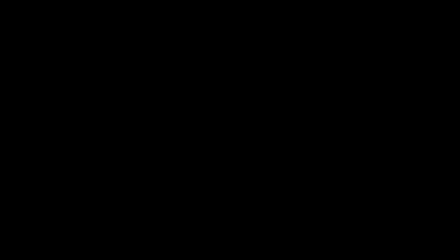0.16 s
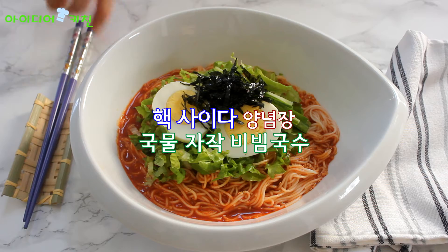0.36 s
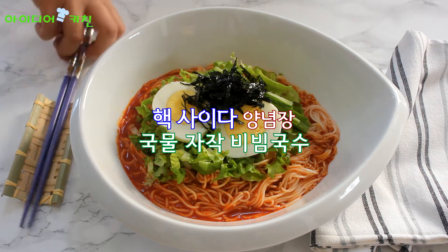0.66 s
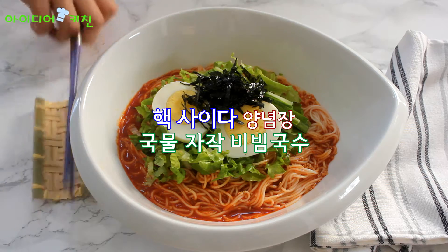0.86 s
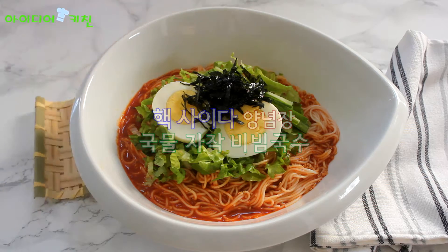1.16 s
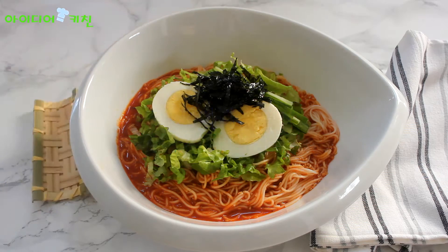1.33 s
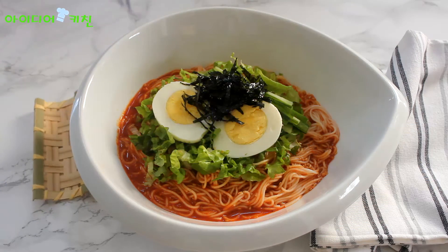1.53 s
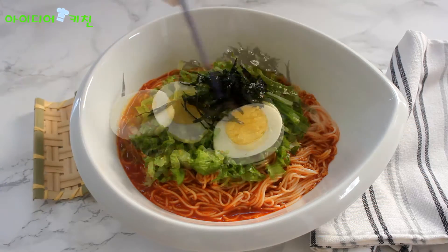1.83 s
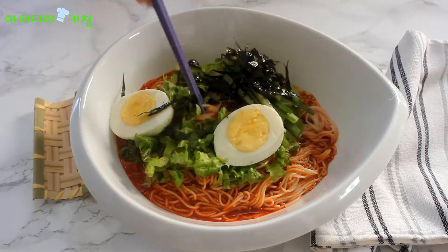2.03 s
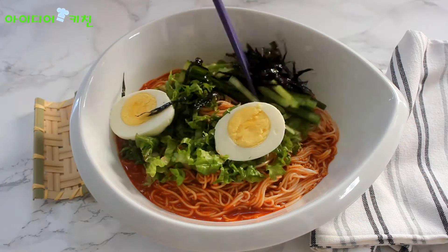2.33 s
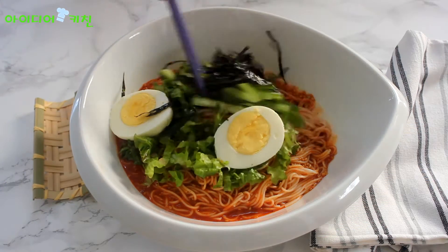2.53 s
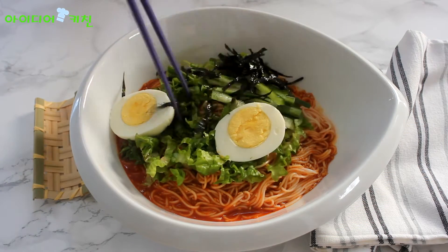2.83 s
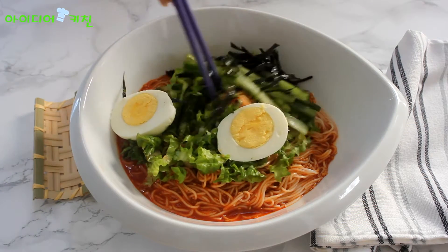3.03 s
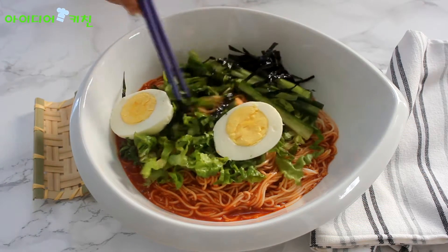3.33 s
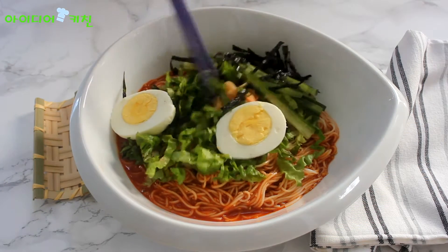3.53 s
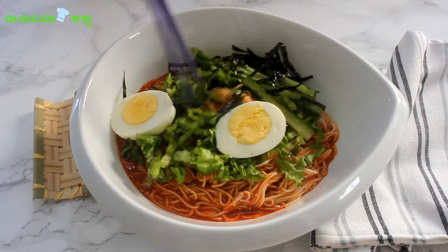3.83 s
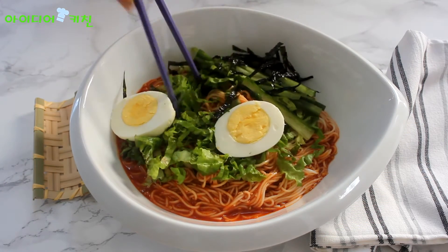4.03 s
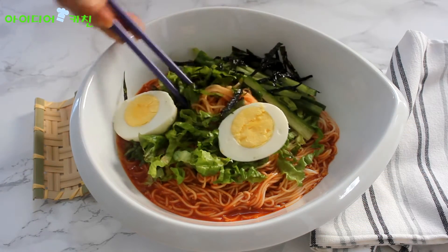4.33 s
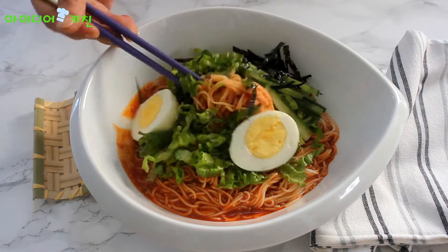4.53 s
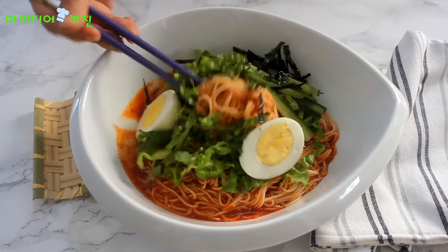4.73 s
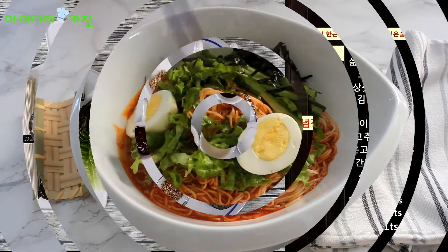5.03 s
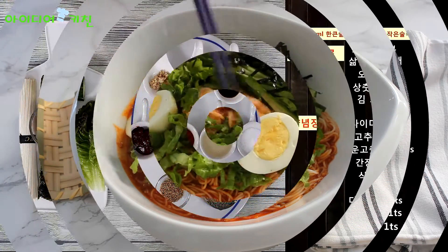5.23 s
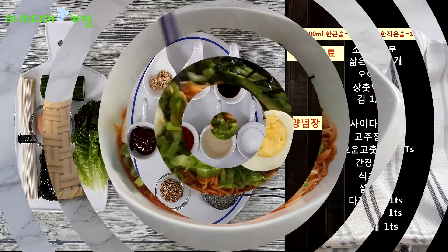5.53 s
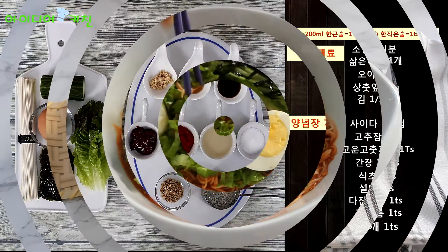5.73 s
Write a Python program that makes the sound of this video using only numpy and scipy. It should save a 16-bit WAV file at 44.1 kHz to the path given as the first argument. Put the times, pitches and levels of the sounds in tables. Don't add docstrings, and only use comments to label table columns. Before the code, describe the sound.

Hard chopsticks clink, slide and get knocked sharply level on a counter, then stir wet noodles and crisp leaves over a faint fridge hum.

```python
import sys
import numpy as np
from scipy import signal
from scipy.io import wavfile

SR = 44100
rng = np.random.default_rng(int(sys.argv[2]) if len(sys.argv) > 2 else 0)


def master_out(mix):
    frames = np.transpose(np.atleast_2d(mix))
    ceiling = np.clip(frames, -1, 1)
    pcm = np.round(ceiling * 32767).astype(np.int16)
    wavfile.write(sys.argv[1], SR, pcm)


def gain_from_db(level_db):
    decades = np.asarray(level_db, float) / 20
    return 10 ** decades


N = 259484


def rms_one(x):
    return x / np.sqrt(np.mean(x ** 2) + 1e-20)


def drift(rate):
    r = np.exp(-80 * np.pi * rate / SR)
    slow = signal.lfilter([1], [1, -2 * r, r * r], rng.standard_normal(N // 40 + 2002))[2000:]
    return np.interp(np.arange(N) / 40, np.arange(len(slow)), rms_one(slow))


def ring(clicks, hz, t60):
    r = gain_from_db(-60 / (t60 * SR))
    w = 2 * np.pi * hz / SR
    return signal.lfilter([0, np.sin(w)], [1, -2 * r * np.cos(w), r * r], clicks + 1e-18)


def band(x, low_hz, high_hz):
    edges = [low_hz, min(high_hz, .45 * SR)]
    return signal.sosfilt(signal.butter(2, edges, "band", fs=SR, output="sos"), x)


def coloured(spectrum, patchy_db, rate):
    hz, db = np.transpose(spectrum)
    edges = hz[0] * 2 ** np.arange(0, np.log2(hz[-1] / hz[0]) + .5, .5)
    white, out, together = rng.standard_normal((2, N)), 0, drift(rate)
    for k, (low, high) in enumerate(zip(edges, edges[1:])):
        level_db = np.interp(np.log(low * high) / 2, np.log(hz), db)
        flicker_db = patchy_db * (together + drift(rate))
        out = out + gain_from_db(level_db + flicker_db) * band(white[k % 2], low, high)
    return rms_one(out)


def struck(times, level_db, modes, spread_db, contact):
    at, out = np.round(np.asarray(times) * SR).astype(int), np.zeros(N)
    chance = rng.standard_normal((len(at), len(modes)))
    t = np.arange(256) / SR
    for k, (hz, mode_db, t60) in enumerate(modes):
        clicks = np.zeros(N)
        clicks[at] = gain_from_db(level_db + mode_db + spread_db * chance[:, k])
        ragged = 1 + .5 * rng.standard_normal(256)
        push = ragged * np.cos(2 * np.pi * hz * t + k) * np.exp(-t / contact)
        push = push / np.abs(np.sum(push * np.exp(-2j * np.pi * hz * t)))
        out += ring(signal.oaconvolve(clicks, push)[:N], hz, t60)
    return out


def cracks(times, level_db, decay, low_hz):
    out = np.zeros(N + 512)
    bursts = rng.standard_normal((len(times), 512)) * np.exp(-np.arange(512) / SR / decay)
    bursts[:, :2] += [2.0, -2.0]
    for s, db, burst in zip(times, level_db, bursts):
        at = round(s * SR)
        out[at:at + 512] += gain_from_db(db) * burst
    return band(out[:N], low_hz, 17400)


def strokes(rows):
    rise_share, edge_db, roundness, rest_db = 0.51, 10.5, 1.1, -71
    t = np.arange(0, N + 64, 64) / SR
    s, db, length, dull_db = np.transpose(rows)[:, :, None]
    away = np.where(t < s, (s - t) / rise_share, t - s) / np.maximum(length, .01)
    power = gain_from_db(2 * (db - edge_db * away ** roundness))
    levels = []
    for offset_db in (0, dull_db):
        total = gain_from_db(2 * rest_db) + np.sum(power * gain_from_db(2 * offset_db), axis=0)
        levels.append(np.interp(np.arange(N) / SR, t, 10 * np.log10(total)))
    return levels


# pitch_hz, level_db, t60_s
STICK_MODES = [(3400, -20, .012), (5270, -10, .02), (7180, -6, .022), (9250, -6, .02), (11480, -4, .016),
               (13850, -4, .013), (15400, -11, .01)]


def lasting_modes():
    return [(hz * pair, mode_db - 28 - hz / 1000, 30.0 * t60)
            for hz, mode_db, t60 in STICK_MODES[1:5] for pair in (.975, .995, 1.02)]


# start_s, peak_db
CLINKS = [(0.592, -36), (0.6006, -16), (0.6028, -10), (.6085, -16), (0.6127, -11.5), (0.6782, -25),
          (.689, -27), (0.7015, -21), (0.704, -23), (0.7088, -5), (0.7118, -1.5), (.7240, -9.5),
          (0.7313, -18), (0.748, -32), (.753, -23), (.757, -30), (0.795, -26), (1.210, -34), (1.243, -27.5)]


def clinks():
    s, db = np.transpose(CLINKS)
    rings = struck(s, db - 8, STICK_MODES + lasting_modes(), spread_db=3, contact=.0002)
    return gain_from_db(-0.5) * rings + cracks(s, db - 9.0, decay=0.0017, low_hz=3500)


def chatter():
    start_s, first_gap_s, gap_growth = 1.5502, .0155, .85
    first_db, touch_loss_db, follow_s, follow_db = -3, 1.5, .0035, -5
    touch, second = np.divmod(np.arange(16), 2)
    bounce_s = first_gap_s * (gap_growth ** touch - 1) / (gap_growth - 1)
    s = start_s + bounce_s + second * follow_s * rng.uniform(.7, 1.4, 16)
    db = first_db - touch_loss_db * touch + follow_db * second + 1.3 * rng.standard_normal(16)
    lasting = lasting_modes()
    gripped = struck(s, db + 1, STICK_MODES[3:] + lasting[6:], spread_db=4, contact=.0012)
    after = struck(s[:1], db[0], lasting, spread_db=2, contact=.0002)
    edges = cracks(s, db - 10, decay=.0018, low_hz=10000)
    return gain_from_db(2.0) * after + gain_from_db(-14.0) * band(gripped, 8200, 18000) + edges


# start_s, peak_db
KNOCKS = [(.534, -33), (0.6, -20), (0.609, -26), (.682, -58.5), (.700, -36), (0.721, -23.5), (0.734, -31),
          (0.796, -22), (0.801, -25.5), (1.5501, 12), (1.5651, 0), (1.5757, 3)]
# pitch_hz, level_db, t60_s
COUNTER_MODES = [(400, -15, 0.013), (763, -14.5, 0.018), (937, -2.5, 0.034), (1163, 7.5, 0.006),
                 (1228, 1.5, 0.019), (1520, 9, 0.004), (1760, -11, 0.04), (2283, -2.5, 0.0092),
                 (3146, 0.5, 0.0034), (4400, 0, 0.0014)]


def knocks():
    s, db = np.transpose(KNOCKS)
    rings = band(struck(s, db - 6, COUNTER_MODES, spread_db=2, contact=.0005), 260, 18000)
    pulses = np.zeros(N)
    pulses[np.round(s * SR).astype(int)] = gain_from_db(db)
    return gain_from_db(-0.9) * rings + cracks(s, db - 21.5, decay=0.0017, low_hz=1450), pulses


# peak_s, rub_db, length_s, scrape_db (mat scrape relative to the rub)
MOVES = [(.45, -63, .07, 7), (.54, -64, .05, 17.5), (.60, -42, .04, -3.5), (.69, -37.5, .04, -1),
         (.74, -35.5, .05, -3.5), (.83, -50, .1, 2), (.946, -52, .05, -9.5), (1.132, -48, .05, -9.5),
         (1.216, -46.5, .03, -19.5), (1.31, -36.5, .08, -15), (1.52, -39.5, .07, -14.5)]
# pitch_hz, level_db (per Hz)
RUB_SPECTRUM = [(880, -37), (1500, -8), (2160, -5.5), (2370, 5), (3380, -5), (6830, 1.5), (7840, -4),
                (11400, 1.5), (16000, -0.5)]
# pitch_hz, width_hz, level_db
MAT_SCRAPE = [(819, 42, -6), (1053, 250, -8), (1380, 100, -6.5), (2100, 600, -10.5), (4000, 1500, -5.5)]


def slide():
    rub_db, scrape_db = strokes(MOVES)
    on = np.interp(np.arange(N) / SR, [1.6, 1.75], [1, 0])
    rub = coloured(RUB_SPECTRUM, patchy_db=0.74, rate=64)
    rub = rub + gain_from_db(-23.5) * rms_one(sum(ring(rub, hz, 0.016) for hz, db, t60 in STICK_MODES))
    grit = rng.standard_normal(N) * gain_from_db(3.0 * drift(60))
    scrape = sum(gain_from_db(db) * rms_one(ring(grit, hz, 2.2 / width)) for hz, width, db in MAT_SCRAPE)
    return on * (gain_from_db(rub_db) * rub + gain_from_db(scrape_db - 0.5) * scrape)


# start_s, peak_db
THUDS = [(.683, -31), (.714, -30), (.731, -30.5), (.756, -32), (.797, -33), (.813, -36.5), (.826, -36.5)]
# pitch_hz, level_db, t60_s
MAT_MODES = [(744.4, 0, 0.035), (940, -4.5, 0.076)]


def mat():
    s, db = np.transpose(THUDS)
    return struck(s, db, MAT_MODES, spread_db=2, contact=.002)


def drizzle(level_db, low_hz, high_hz, cycles, per_s):
    sizes = gain_from_db(3.7 * np.minimum(rng.exponential(1, N), 3)) * rng.choice([-1, 1], N)
    pace = per_s * gain_from_db(.5 * (level_db + 58) + 7.8 * drift(40))
    born = rng.random(N) < pace / SR
    pitches, dealt = np.geomspace(low_hz, high_hz, 10), rng.integers(0, 10, N)
    rings = sum(ring(sizes * born * (dealt == k), hz, cycles / hz) for k, hz in enumerate(pitches))
    return gain_from_db(level_db) * rms_one(rings / gain_from_db(.25 * (level_db + 55)))


def pop(hz, ragged, cycles):
    t = np.arange(256) / SR
    span = np.clip(cycles / hz, .00025, .0012)
    swell = t / span * np.exp(1 - t / span)
    side = 1.7 * np.sin(2 * np.pi * hz * 1.35 ** ragged[0] * t) * np.exp(-t / span)
    return swell * np.sin(2 * np.pi * hz * t + ragged[1]) + side


def strays(bright_db):
    per_s, mean_db, spread_db, low_hz, high_hz = 100, -36, 5, 3000, 15300
    luck, size, pitch = rng.random((3, N))
    pace = per_s * gain_from_db(1.3 * np.minimum(bright_db + 57, 1.5))
    first = round(1.75 * SR)
    at = np.flatnonzero((luck < pace / SR)[first:-600]) + first
    db = mean_db + .3 * (bright_db[at] + 53) + spread_db * np.log(size[at] + .05)
    hz = low_hz * (high_hz / low_hz) ** pitch[at] ** .7
    return list(zip(at / SR, db, hz))


# start_s, peak_db, pitch_hz
CREAKS = [
    (0.5151, -33, 3520),
    (0.5175, -36, 4200),
]
# start_s, peak_db, pitch_hz
POPS = [(1.8432, -28.5, 7540), (1.9494, -29.5, 5730), (2.2887, -29.5, 3700), (2.3177, -31.5, 5340),
        (2.4028, -30.5, 6100), (2.4568, -33.5, 4410), (2.9342, -31.5, 5800), (2.981, -33, 7800),
        (3.0971, -30.5, 3430), (3.1009, -29.5, 3360), (3.1617, -35, 4030), (3.3388, -33, 5860),
        (3.3927, -35, 5560), (3.4746, -33, 4780), (3.4873, -31.5, 5430), (3.6454, -34.5, 2000),
        (3.834, -29, 5400), (4.1764, -27, 7155), (4.4182, -30, 5030), (4.4465, -32, 7760),
        (4.4565, -28, 7320), (4.773, -34, 4020), (4.8364, -30.5, 7870), (5.3159, -27, 6200),
        (5.415, -34, 4600), (5.5005, -27.5, 5850), (5.5419, -29.5, 4950), (5.654, -29, 4530),
        (5.8354, -29, 4880), (5.8653, -34.5, 3720),
        (2.012, -30, 11900), (2.1146, -43, 8140), (2.4066, -27.5, 12800), (2.4338, -25, 14600),
          (2.4763, -27, 11400), (2.499, -24, 13900), (2.605, -32.5, 12490), (2.6127, -30.5, 9300),
          (2.667, -30, 13200), (2.925, -32, 11100), (2.9463, -26, 9100), (2.973, -31, 8480),
          (3.0063, -28, 9300), (3.0623, -28.5, 8400), (3.1077, -33, 12030), (3.1402, -27.5, 8100),
          (3.4202, -29.3, 12300), (3.5654, -24.5, 10200), (4.0343, -27, 14000), (4.5436, -25.5, 15630),
          (4.5557, -41, 10900), (4.789, -30.5, 12100), (4.8121, -40, 11970), (5.3974, -25.5, 13300),
          (5.432, -37, 11100), (5.473, -23, 15900), (5.518, -29, 12600), (5.7762, -36, 10500),
          (5.8603, -33.6, 15000), (3.7181, -36, 8600)]


def bursts(bright_db):
    out = np.zeros(N + 256)
    pops = POPS + strays(bright_db)
    rows = CREAKS + pops
    chance = np.clip(rng.standard_normal((len(rows), 2)), -1.5, 1.5)
    for (s, db, hz), ragged in zip(rows, chance):
        at = round((s - .0004) * SR)
        out[at:at + 256] += gain_from_db(db - 1.6) * pop(hz, ragged, cycles=1.43)
    s, db, hz = np.transpose(pops)
    return out[:N] + cracks(s - .0003, db - 12.5, decay=0.0018, low_hz=3000)


# peak_s, crackle_db, length_s, squelch_db (relative to the crackle)
STROKES = [(1.82, -54, 0.28, -4), (2.07, -64, 0.085, -14), (2.22, -63, .04, -12), (2.31, -59.5, 0.06, -12),
           (2.496, -43.5, 0.073, -24), (2.61, -57, 0.045, -5), (2.78, -67, 0.04, 3),
           (2.87, -58.5, 0.042, -15.5), (2.97, -54.5, 0.14, -12), (3.11, -54, 0.11, -1.5),
           (3.235, -48, 0.043, -9), (3.31, -51.5, 0.091, -7), (3.461, -46.5, 0.076, -7.5),
           (3.57, -60, 0.11, -5), (3.733, -51.5, 0.075, -4.5), (3.91, -59.5, .1, -0.5),
           (4.106, -42, 0.037, -10.5), (4.2, -52, 0.18, -11), (4.33, -62, 0.11, 1.5),
           (4.432, -47.5, 0.05, -3.5), (4.54, -51.5, 0.097, -2.5), (4.71, -53, 0.041, -18),
           (4.794, -50, 0.049, 4.5), (4.91, -60.5, 0.071, -5), (5.275, -51, 0.069, -2),
           (5.39, -53, 0.1, -14), (5.51, -52.5, .07, -13), (5.65, -55.5, 0.098, 2),
           (5.74, -41.5, 0.065, -5.5), (5.85, -58, 0.042, 1.5)]
# pitch_hz, level_db (per Hz)
WET_SPECTRUM = [(470, -45), (800, -46), (1420, 20), (2180, -11), (3380, -12), (4240, 8), (8770, -10.5),
                (14800, 1.5), (16000, -13.5)]


def food():
    bright_db, dull_db = strokes(STROKES)
    on = np.interp(np.arange(N) / SR, [1.6, 1.75], [0, 1])
    small = gain_from_db(-.5) * drizzle(bright_db, 2800, 14500, cycles=14.0, per_s=450)
    squelch = gain_from_db(2.0) * drizzle(dull_db, 580, 3350, cycles=3.1, per_s=280)
    hiss = gain_from_db(bright_db - 8) * coloured(WET_SPECTRUM, patchy_db=1.5, rate=20)
    return bursts(bright_db) + on * (small + squelch + hiss)


# start_s, crack_db, hollow_hz, hollow_db
SNAPS = [
    (4.0940, -25, 1680, -17.5),
    (4.0942, -11.5, 940, -30.5),
    (4.1000, -18, 2744, -17.5),
    (4.1064, -32, 7300, -20),
    (4.114, -44, 5220, -38),
    (5.721, -29.5, 2174, -25),
    (5.769, -15.5, 987, -31.5),
]


def snaps():
    hollow = 0
    for s, crack_db, hz, hollow_db in SNAPS:
        hollow = hollow + struck([s], hollow_db, [(hz, 0, 14 / hz)], spread_db=0, contact=.0003)
    s, db = np.transpose(SNAPS)[:2]
    return cracks(s, db + 5, decay=0.0007, low_hz=5760) + hollow


# start_s, length_s, hiss_db
DRAGS = [
    (2.195, 0.32, -55.5),
    (2.663, 0.25, -61),
    (3.27, 0.069, -59.5),
    (3.64, 0.066, -53),
    (3.995, .08, -54.5),
    (4.224, 0.17, -64),
    (4.621, 0.16, -68.5),
    (4.847, 0.12, -56),
    (5.578, 0.15, -66),
]


def drags():
    t = np.arange(N) / SR
    gate = 0
    for s, length, db in DRAGS:
        fade_in = np.clip((t - s) / 0.021, 0, 1)
        stop = np.clip((s + length - t) / 0.0051, 0, 1)
        gate = gate + gain_from_db(db) * fade_in * stop
    return gate * rms_one(band(rng.standard_normal(N), 8100, 20000))


# pitch_hz, level_db (for the knocks), t60_s
TAIL = [(350, -33.5, 0.54), (674, -17, 0.73), (1031, -0.5, 0.58), (1362, 3, 0.65), (1875, 3, 0.66),
        (2870, -11.5, 0.6), (4200, -24, 0.67), (6235, -32.5, 0.4), (8600, -20, 0.36), (12240, -18, 0.22)]


def echoes():
    t = np.arange(SR) / SR
    thick = np.clip(.06 + 8.0 * t, 0, 1)
    arrivals = rng.standard_normal(SR) * (rng.random(SR) < thick)
    rise = np.clip(t / 0.0045, 0, 1)
    return np.array([gain_from_db(-60 * t / t60) * band(arrivals, hz / 1.322, hz * 1.17) * rise
                     for hz, db, t60 in TAIL])


def kitchen(near, pulses):
    bands = echoes()
    boom = gain_from_db(np.array(TAIL)[:, 1]) @ bands
    knock_tail = gain_from_db(-10) * signal.fftconvolve(pulses, boom)[:N]
    return knock_tail + gain_from_db(-38.5) * signal.fftconvolve(near, bands.sum(axis=0))[:N]


# pitch_hz, level_db (rms)
HUM = [(59.2, -58.5), (118.4, -65), (172.3, -64.5), (199.2, -51.5), (203.5, -71), (241.5, -61)]
# pitch_hz, level_db (per Hz)
AIR_SPECTRUM = [(24, -39.5), (40, -6.5), (151, -8.5), (215, -2.5), (790, -12.5), (852, -14.5), (965, -16.5),
                (1150, -20), (1410, -13), (1630, -27), (1760, -22.5), (4030, -28.5), (5310, -27.5),
                (16000, -34.5)]


def fridge():
    t = np.arange(N) / SR
    lines = 0
    for hz, db in HUM:
        level = gain_from_db(db + 3 + 1.5 * drift(3))
        lines = lines + level * np.sin(2 * np.pi * hz * t + .5 * drift(2))
    return lines + gain_from_db(-50.5) * coloured(AIR_SPECTRUM, patchy_db=0.82, rate=2.7)


def scene():
    knock, pulses = knocks()
    near = clinks() + chatter() + slide() + mat() + food() + snaps() + drags()
    return (near + knock + kitchen(near, pulses) + fridge())[None]


def roll_off(x):
    return signal.sosfilt(signal.butter(12, 16440, fs=SR, output="sos"), x)


def record(dry):
    start_s, recovery_db_per_s, smooth_s = 0.377, 45, 0.027
    t = np.arange(N) / SR
    over_db = np.maximum(20 * np.log10(np.abs(dry[0]) + 1e-9) + 2.0, 0)
    fall_db = recovery_db_per_s * t
    held_db = np.maximum.accumulate(over_db + fall_db) - fall_db
    r = np.exp(-1 / (smooth_s * SR))
    duck_db = signal.lfilter([1 - r], [1, -r], np.maximum(held_db, 0))
    dry = signal.sosfilt(signal.ellip(8, .3, 40, 15900, fs=SR, output="sos"), dry)
    dry = signal.sosfilt(signal.butter(4, 46, "high", fs=SR, output="sos"), dry)
    clipped = np.clip(dry * gain_from_db(-.6 * duck_db), -1, 1)
    mix = clipped * np.clip((t - start_s) / 0.0045, 0, 1)
    return roll_off(mix)


dry = scene()
out = record(dry)
master_out(out)
```